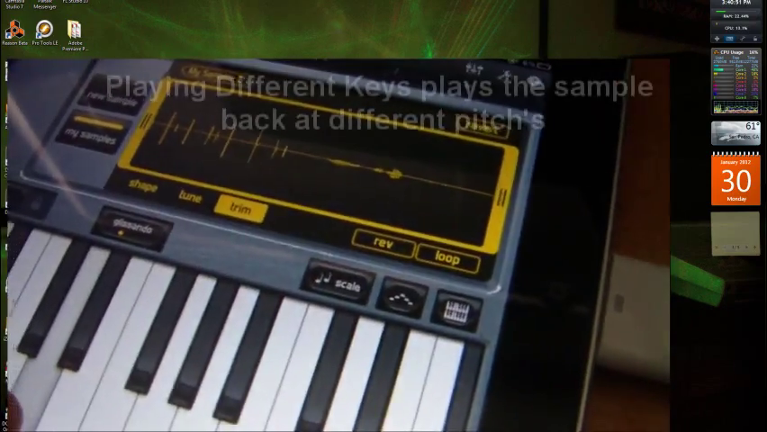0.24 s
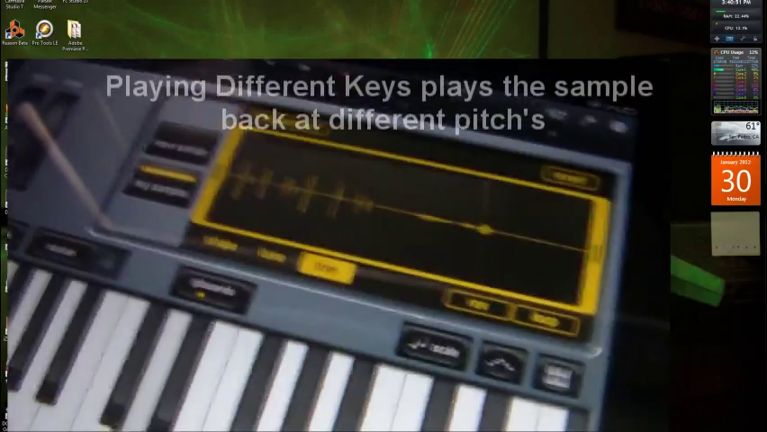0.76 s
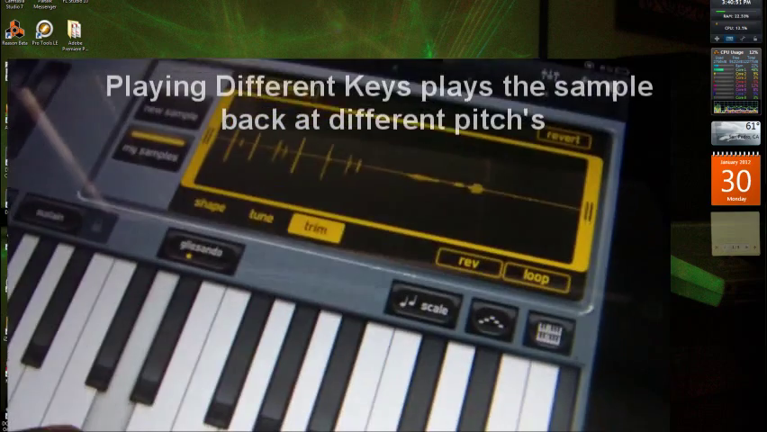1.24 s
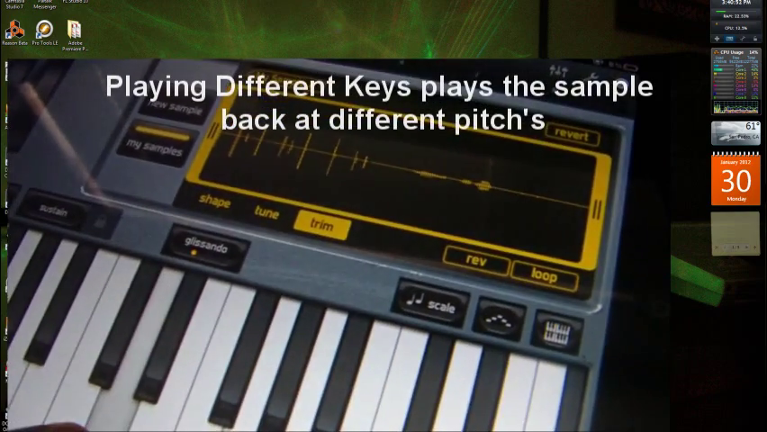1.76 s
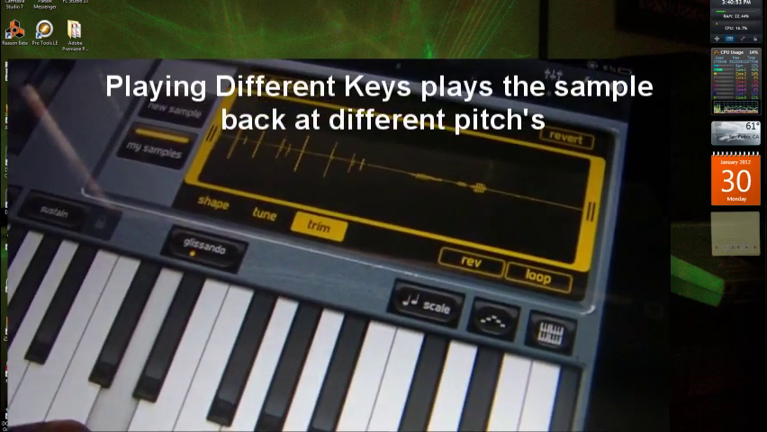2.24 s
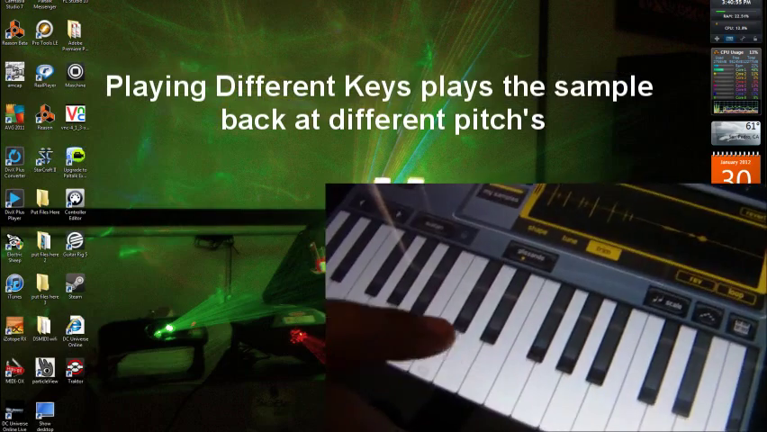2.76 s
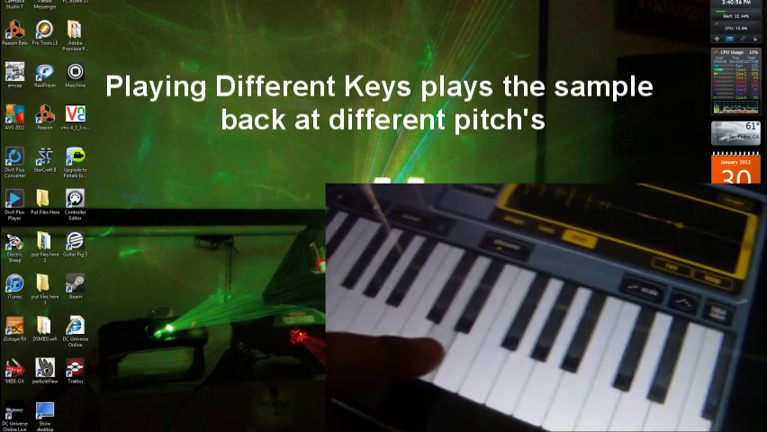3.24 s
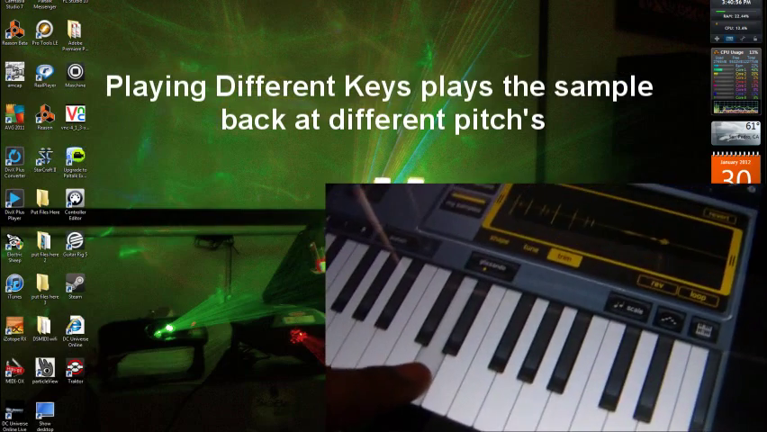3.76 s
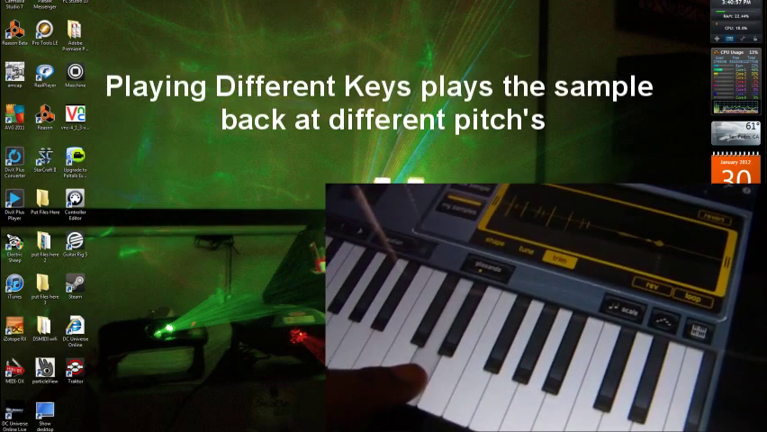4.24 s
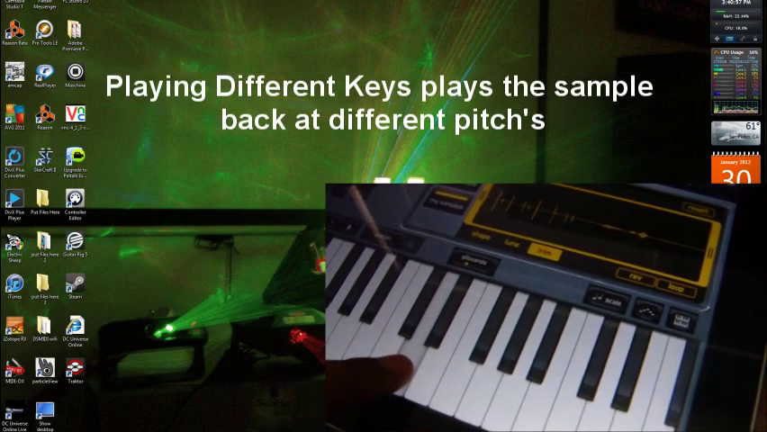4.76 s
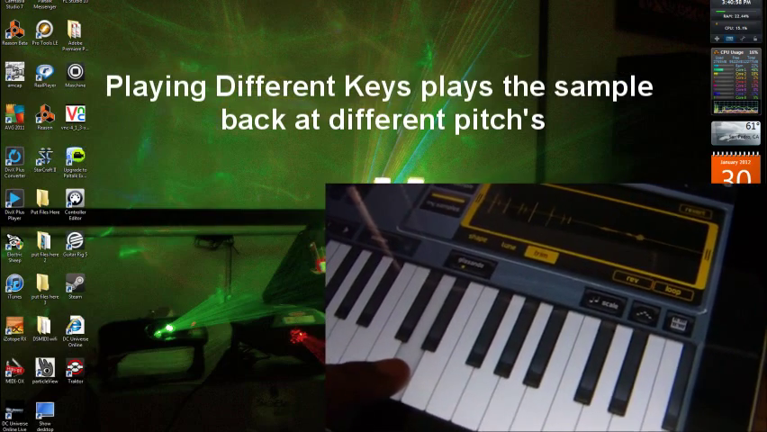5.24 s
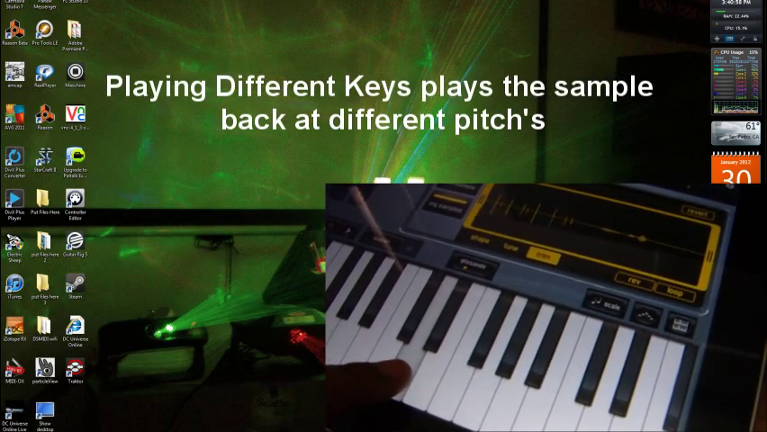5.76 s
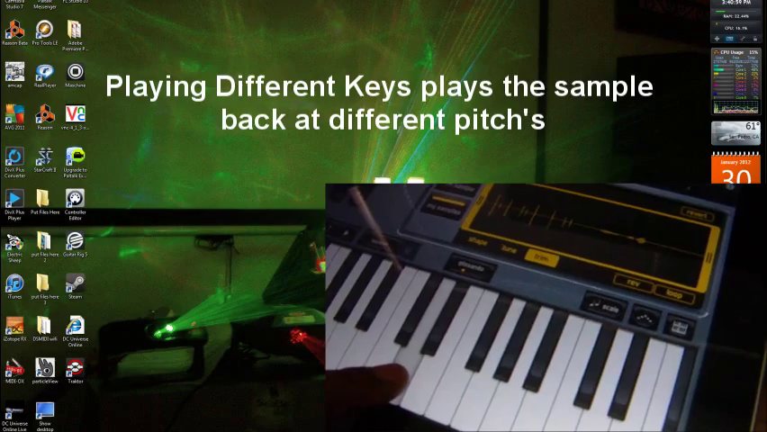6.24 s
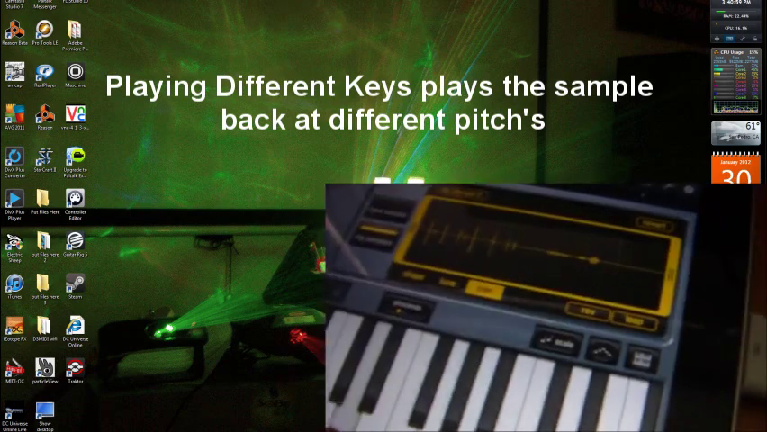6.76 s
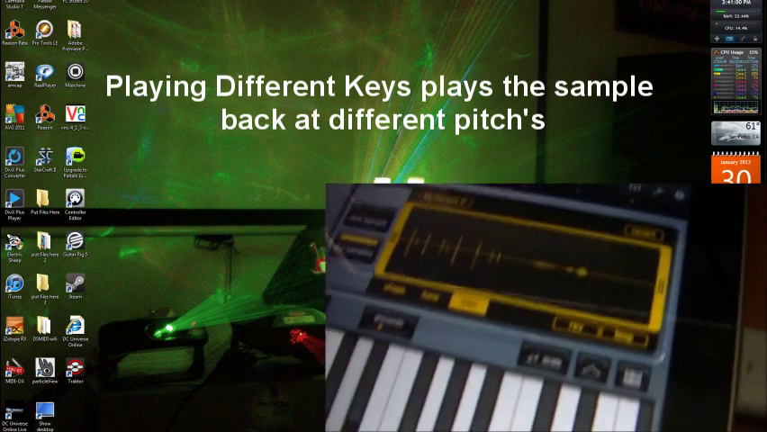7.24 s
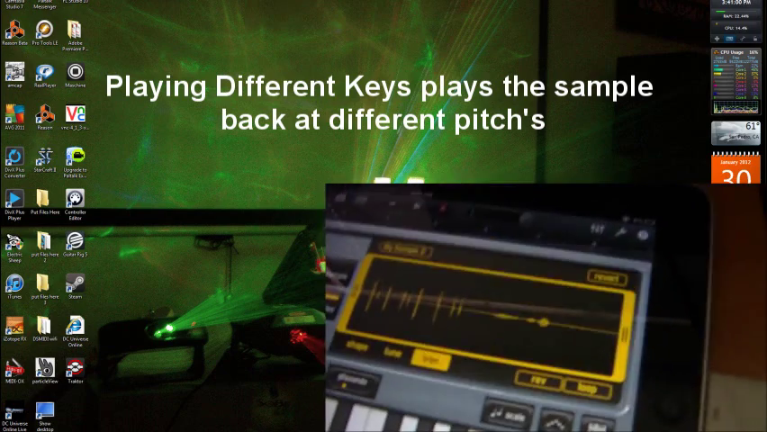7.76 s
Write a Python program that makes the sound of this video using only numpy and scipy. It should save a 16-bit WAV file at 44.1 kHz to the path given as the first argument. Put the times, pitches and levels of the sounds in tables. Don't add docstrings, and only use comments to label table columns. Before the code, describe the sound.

A quiet, dry room with soft, nearly centred low fan rumble, gently wavering, under constant fine hiss and a very faint whine. Close by, fingertips tap a tablet, each a short dull low thud with a small tick. Gentle taps come at 0.4, 1.2, 1.5 and 1.9 seconds; a thin metallic clink rings briefly at 1.55. Skin brushes the case faintly at 0.6 and 2.1. At 2.4 the sound dips for an instant and the stereo balance shifts slightly. Firm, heavy knocks land at 3.0, with a dry clink, and 3.65, then a weak one at 4.0 and medium ones at 4.4, 5.2 and 5.4. Soft rubbing near 5.6 precedes a hard thud at 5.9. A scratchy clink at 6.75 leads into another hard knock at 6.8; the faintest clink follows at 7.2, then lighter taps at 7.5 and 7.8.

```python
import sys
import numpy as np
from scipy import signal
from scipy.fft import rfft, irfft, next_fast_len
from scipy.io import wavfile
from scipy.ndimage import uniform_filter1d, map_coordinates

SR = 44100
rng = np.random.default_rng(int(sys.argv[2]) if len(sys.argv) > 2 else 0)


def ratio_of_db(decibels):
    return 10 ** (np.asarray(decibels, float) / 20)


def store_pcm(level_fs):
    pcm = np.round(np.clip(level_fs, -1, 1) * 32767).astype(np.int16)
    wavfile.write(sys.argv[1], SR, np.atleast_2d(pcm).T)


N = 352662

# pitch_hz, level_db (rms)
WHINE = [(1000, -73.5), (2000, -80.5), (2087, -85), (2165, -86), (3000, -87.5), (4000, -86.5),
         (9000, -96.5)]
# freq_hz, level_db (per Hz)
HISS = [(1760, -30), (3000, -2.5), (3820, -3.5), (4150, -1.5), (4290, -2), (14200, -6.5), (15600, -10)]
# freq_hz, level_db (per Hz)
FAN_SPECTRUM = [(12, -47), (20, -4.5), (37, -5), (99, -2), (180, -2), (207, -9), (283, -11), (334, -22),
                (377, -16.5), (552, -21.5), (1030, -28), (1270, -30), (1580, -30.5), (3470, -44),
                (6000, -60.5), (7800, -67.5), (13200, -120)]
# pitch_hz, width_hz, level_db
FAN_TONES = [(121.9, 9, -54.5), (179.2, 7, -52.5), (374.3, 16.6, -63), (1044, 77, -71.5)]
# time_s, level_db
AIRFLOW = [(0.0, -42), (0.27, -43.5), (5.46, -43.5), (5.63, -40), (5.95, -43), (7.41, -44.5), (7.66, -40.5),
           (8.0, -43.5)]
# freq_hz, likeness (0 to 1)
FAN_LIKENESS = [(60, 1), (300, 0.95), (1400, 1), (4000, 0.96)]
# freq_hz, t60_s
ROOM_DECAY = [(150, 0.086), (1000, 0.093), (6000, .21), (9000, 0.11), (14000, 0.056)]
# time_s, tablet_left_over_right_db, fans_left_over_right_db
BALANCE = [(0, -.1, -2), (2.39, -.1, -2), (2.41, 1, -.5), (8, 1, -.5)]
# time_s, half_length_s, level_db
LEVEL_DIP = (2.4, .007, -6)
# middle_s, length_s, level_db, pitch_hz
RUBS = [
    (0.64, 0.18, -63, 1340),
    (2.14, 0.17, -58, 1150),
    (4.367, 0.066, -64.5, 980),
    (5.563, 0.15, -63.5, 1340),
    (5.706, 0.19, -58, 462),
]
# start_s, blow_db, scratch_t60_s, ring_db, rebound_db
CLINKS = [
    (1.55, -29.5, .048, -11, -8),
    (3.0095, -34.5, .066, -40, -16),
    (6.7374, -31, .07, -24, -12),
    (7.196, -38.5, .035, -32, -16),
]
# pitch_hz, width_hz, level_db
METAL_BODY = [(626, 440, 11), (1250, 470, 3.5), (1870, 320, 6.5), (2950, 530, -5), (4020, 480, 1),
              (5700, 840, -2), (7050, 1800, -1), (12100, 640, 5)]
# pitch_hz, level_db, t60_s
METAL_RINGS = [(4050, -8, .03), (5597, .1, .065), (6575, -12, .08), (12000, -13, .04)]
# start_s, push_db, contact_ms, slab_hz, long_glass_bend_db
TAPS = [(0.4277, -1.6, 5.31, 124, -3.6), (1.1896, -4.0, 5.26, 141, 1.6), (1.4554, -7.5, 5.23, 146, -.3),
        (1.9097, 1.7, 5.09, 143, .5), (2.9972, 11.9, 6.5, 136, -5.2), (3.6544, 13.6, 5.57, 146, 1.8),
        (3.9667, -2.9, 6.38, 147, -7.7), (4.41, 5.2, 4.82, 121, .3), (5.1717, 6.3, 5.63, 144, 2.6),
        (5.4373, 2.6, 6.5, 155, 2.7), (5.892, 13.3, 5.47, 147, 1.2), (6.8259, 12.9, 5.34, 150, 1.4),
        (7.4912, 6.0, 5.55, 147, 2.0), (7.816, 1.5, 5.35, 142, -1.5)]
EXTRA_TICK = {1.4554: 4, 1.9097: 5, 2.9972: 4, 4.41: 2.5, 5.892: 3, 6.8259: -3}
# pitch_hz, width_hz, level_db
KNOCK_MODES = [(890, 670, 10), (1150, 183, 14), (1660, 430, 4)]
# pitch_hz, width_hz, level_db
CLICK_MODES = [(1790, 250, 3), (3560, 1400, -8), (4970, 500, -6), (6600, 600, -8.5)]
# pitch_hz, width_hz
GRIP = (124, 145)
# pitch_hz, width_hz
GLASS_BENDS = [((432, 141), (432, 142)), ((628, 142), (683, 354))]
# pitch_hz, width_hz, level_db
DESK_RING = (240, 20, -18.5)


def unit(x):
    return x / np.sqrt(np.mean(x ** 2) + 1e-20)


def along(points, hz):
    f, v = np.transpose(points)
    return np.interp(np.log(hz + 1), np.log(f + 1), v)


def curves(rows):
    s, *cols = np.transpose(rows)
    return [np.interp(np.arange(N) / SR, s, c) for c in cols]


def wobble(rate):
    knots = rng.standard_normal(int(N * rate / SR) + 4)
    return map_coordinates(knots, [np.arange(N) * rate / SR])


def filtered(x, response):
    n = x.shape[-1]
    m = next_fast_len(n + 4096)
    return irfft(rfft(x, m) * response(np.fft.rfftfreq(m, 1 / SR)), m)[..., :n]


def mode(f, hz, width):
    return 1j * f * width / (hz * hz - f * f + 1j * f * width)


def two_stage(f, first, second):
    return mode(f, *first) * mode(f, *second)


def add(track, s, sound):
    part = track[round(s * SR):][:len(sound)]
    part += sound[:len(part)]


def panned(x, db):
    return x * ratio_of_db(np.array([db, -db]) / 2)


def hiss(db):
    colour = [(200, -10.5), (1500, -1.5)] + HISS[1:]
    noise = unit(filtered(rng.standard_normal((2, N)), lambda f: ratio_of_db(along(colour, f))))
    return ratio_of_db(db + .4 * wobble(5)) * noise * ratio_of_db([[-.2], [.2]])


def electronics():
    t = np.arange(N) / SR
    whine = np.zeros(N)
    for hz, db in WHINE:
        whine += np.sqrt(2) * ratio_of_db(db + 1.5 * wobble(12)) * np.sin(2 * np.pi * hz * t)
    return hiss(db=-69.5) + whine


def fans():
    def mid_side(f):
        turn = np.arccos(np.clip(along(FAN_LIKENESS, f), -1, 1)) / 2
        return ratio_of_db(along(FAN_SPECTRUM, f)) * [np.cos(turn), np.sin(turn)]

    mid, side = filtered(rng.standard_normal((2, N)), mid_side)
    air = unit(np.array([mid + side, mid - side]))
    rumble = filtered(air, lambda f: 1 / (1 + (f / 500) ** 4))
    swell_db = curves(AIRFLOW)[0] + 1.17 + 1.83 * wobble(6)
    rush_db = -43 + 0.68 * wobble(2.84)
    tones = np.zeros(N)
    for hz, width, db in FAN_TONES:
        tones += ratio_of_db(db) * unit(filtered(rng.standard_normal(N), lambda f: mode(f, hz, width) ** 2))
    return ratio_of_db(swell_db) * rumble + ratio_of_db(rush_db) * (air - rumble) + tones


def room(x):
    hz, t, z = signal.stft(rng.standard_normal((2, SR // 2)), SR, nperseg=256)
    decay = ratio_of_db(-60 * t / along(ROOM_DECAY, hz)[:, None])
    tail = signal.istft(z * decay, SR, nperseg=256)[1]
    tail = 1.2 * tail[:1] + 0.28 * tail
    late = np.pad(x, (300, 0))[None]
    return signal.fftconvolve(late, tail / np.linalg.norm(tail[0]), axes=1)[:, :N]


def rubs():
    t = np.arange(N) / SR
    out = np.zeros(N)
    for s, length, db, hz in RUBS:
        noise = unit(filtered(rng.standard_normal(N), lambda f: mode(f, hz, .7 * hz) ** 2))
        out += ratio_of_db(db) * np.exp(-(2 * (t - s) / length) ** 2) * noise
    return out


def metal_ring(t):
    ring = np.zeros(len(t))
    for hz, db, t60 in METAL_RINGS:
        wander = .5 * wobble(150)[:len(t)]
        ring += ratio_of_db(db - 60 * t / t60) * np.sin(2 * np.pi * hz * t + wander)
    beat = 1 - 0.38 * np.cos(2 * np.pi * 42 * t)
    return ring * beat * (1 - np.exp(-t / 0.0025))


def metal_body(f):
    peaks = sum(ratio_of_db(db) * np.abs(mode(f, hz, w)) ** 2 for hz, w, db in METAL_BODY)
    return (1 + peaks) / (1 + (f / 14200) ** 12)


def clinks():
    out, t = np.zeros(N), np.arange(SR // 4) / SR
    ring = metal_ring(t)
    rise = 1 - np.exp(-t / .001)
    for s, db, t60, ring_db, rebound_db in CLINKS:
        add(out, s, 2 * ratio_of_db(db + ring_db - 5.0) * ring)
        # delay_s, level_db, t60_s, tilt_db per octave
        contacts = [(0, -4, .045, -3),
                    (.0033, 0, t60, -7.5),
                    (.0255, rebound_db, t60, -1.5)]
        for delay, part_db, fade, tilt_db in contacts:
            def colour(f):
                return ratio_of_db(tilt_db * np.log2(f / 2000 + 0.094)) * metal_body(f) * f / (f + 250)

            scratch = unit(filtered(rng.standard_normal(len(t)), colour))
            add(out, s + delay, ratio_of_db(db - 6.0 + part_db) * scratch * ratio_of_db(-60 * t / fade) * rise)
    return out


def snap(push_db, slab_hz):
    return .1 + .23 * max(push_db - 6.5, 0) + .065 * max(140 - slab_hz, 0)


def glass_modes(f, table):
    return sum((-1) ** k * ratio_of_db(db) * mode(f, hz, w) for k, (hz, w, db) in enumerate(table))


def ticks():
    out, t = np.zeros(N), np.arange(SR // 20) / SR
    knock = filtered(t / .0002 * np.exp(-t / 0.00016), lambda f: glass_modes(f, KNOCK_MODES))
    knock /= np.abs(knock).max()
    for s, push_db, _, slab_hz, _ in TAPS:
        click_db = -52.5 + 0.39 * push_db + 2.5 * snap(push_db, slab_hz)
        knock_db = -44 + 1.13 * push_db
        spray = ratio_of_db(-60 * t / .005) * rng.standard_normal(len(t))
        click = filtered(spray, lambda f: glass_modes(f, CLICK_MODES))
        click /= np.abs(click).max()
        both = ratio_of_db(click_db) * click + ratio_of_db(knock_db) * knock
        add(out, s + .0006, ratio_of_db(EXTRA_TICK.get(s, 0)) * both)
    return out


def thuds():
    out, ms = np.zeros(N), np.arange(SR // 8) * 1000 / SR
    long_bend, short_bend = GLASS_BENDS
    for s, push_db, contact_ms, slab_hz, bend_db in TAPS:
        phase = np.pi * np.clip(ms / contact_ms, 0, 1) ** .85
        push = ratio_of_db(push_db) * np.abs(np.sin(phase)) ** 2.5

        def tablet(f):
            slab = two_stage(f, (slab_hz, 63), GRIP)
            glass = ratio_of_db(bend_db) * two_stage(f, *long_bend)
            glass = glass - snap(push_db, slab_hz) * two_stage(f, *short_bend)
            back = ratio_of_db(DESK_RING[2]) * two_stage(f, DESK_RING[:2], DESK_RING[:2])
            return slab + glass + back

        add(out, s, filtered(push, tablet))
    return out


def scene():
    tablet_db, fan_db = curves(BALANCE)
    thud, bright = thuds(), ticks() + clinks()
    near = panned(thud * ratio_of_db(-tablet_db / 2) + bright + rubs(), tablet_db)
    echo = ratio_of_db(-33) * room(thud) + ratio_of_db(-9.0) * room(bright)
    air = near + echo + panned(fans(), fan_db)
    air[0] = np.roll(air[0], 1)
    return air + hiss(db=-65.5)


def roll_off(x):
    return signal.sosfilt(signal.butter(12, 15720, fs=SR, output="sos"), x)


def record(dry):
    s, half, db = LEVEL_DIP
    x = dry * ratio_of_db(db * np.exp(-((np.arange(N) / SR - s) / half) ** 2))
    ceiling = .342
    crossings = np.r_[0, np.flatnonzero(np.diff(np.sign(x.sum(0)))) + 1]
    need = np.minimum(1, ceiling / (np.abs(x).max(0) + 1e-9))
    gain = np.repeat(np.minimum.reduceat(need, crossings), np.diff(np.r_[crossings, N]))
    gain = uniform_filter1d(uniform_filter1d(gain, size=56), size=56)
    mix = filtered(x * gain + electronics(), lambda f: f < 15980)
    return roll_off(mix)


dry = scene()
out = record(dry)
store_pcm(out)
```